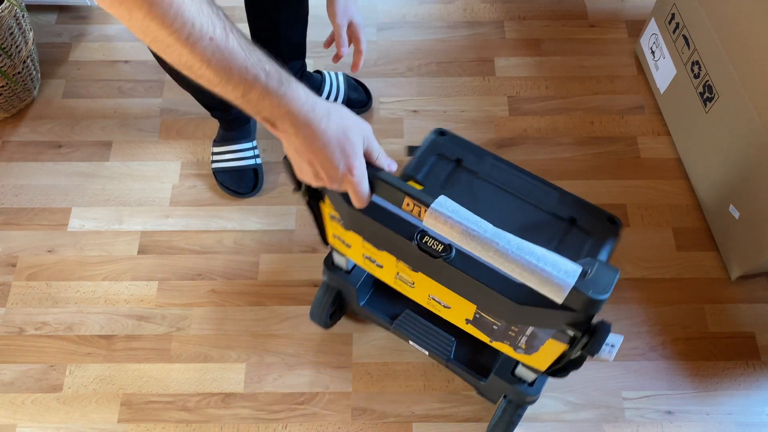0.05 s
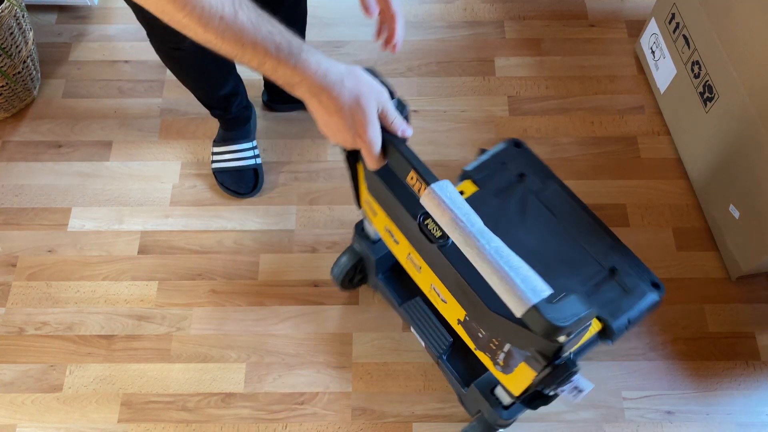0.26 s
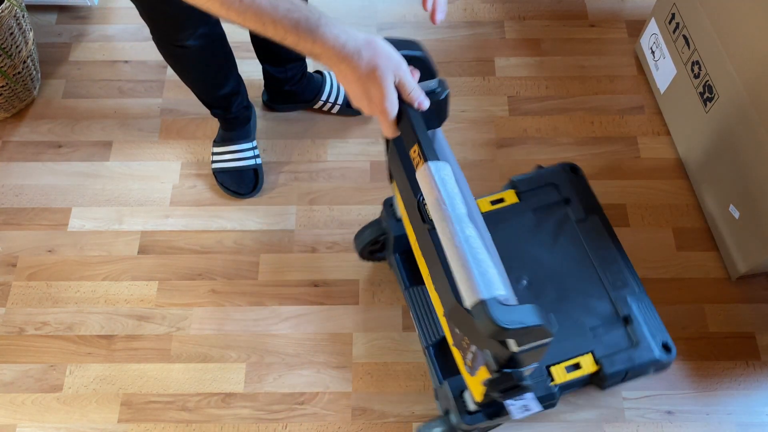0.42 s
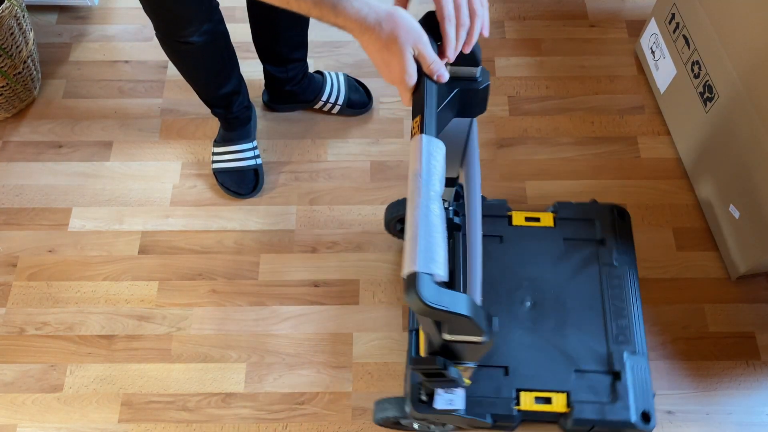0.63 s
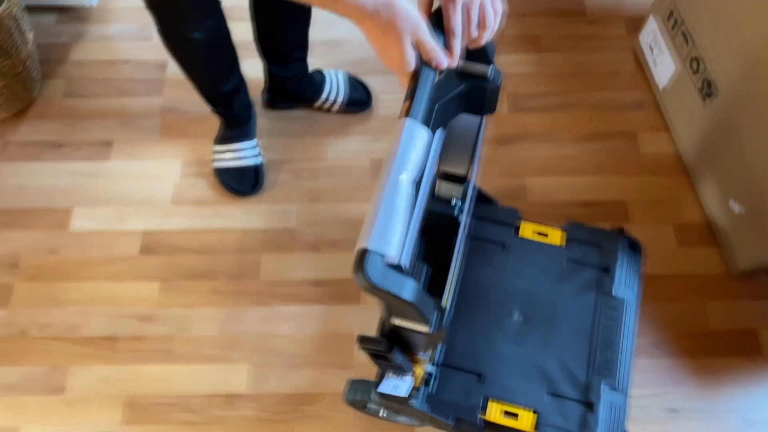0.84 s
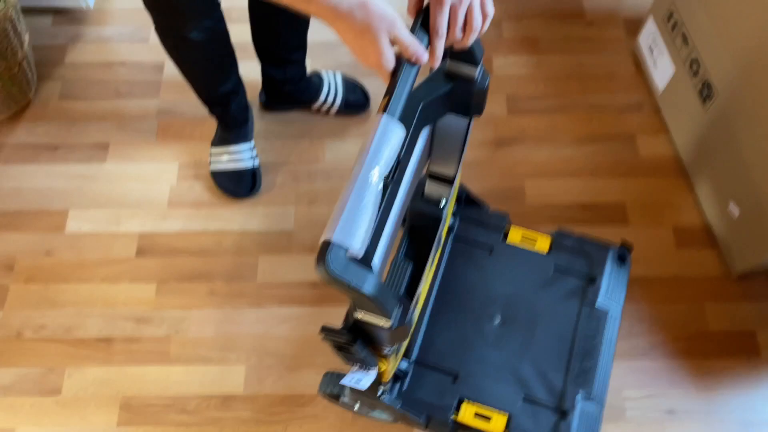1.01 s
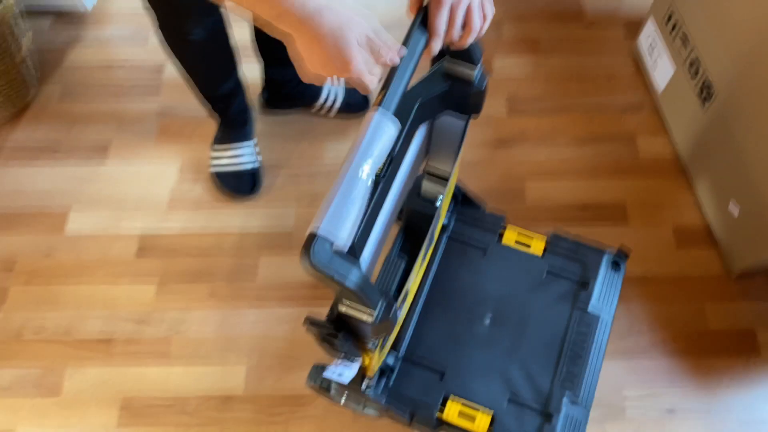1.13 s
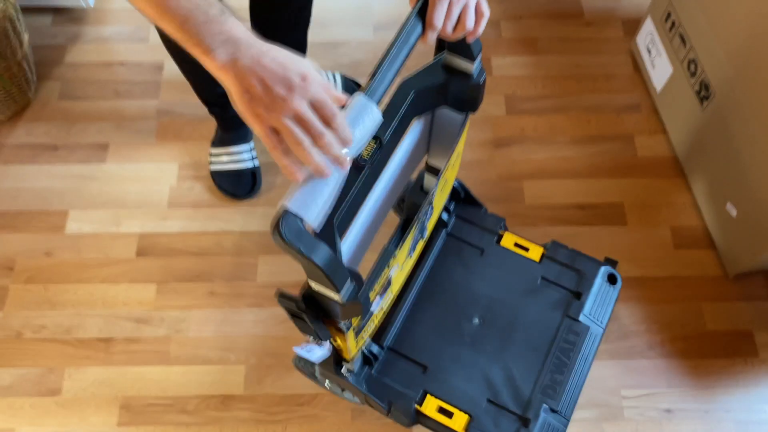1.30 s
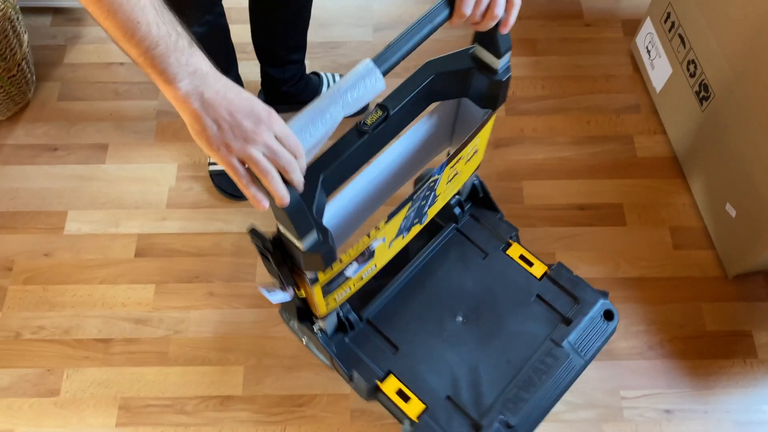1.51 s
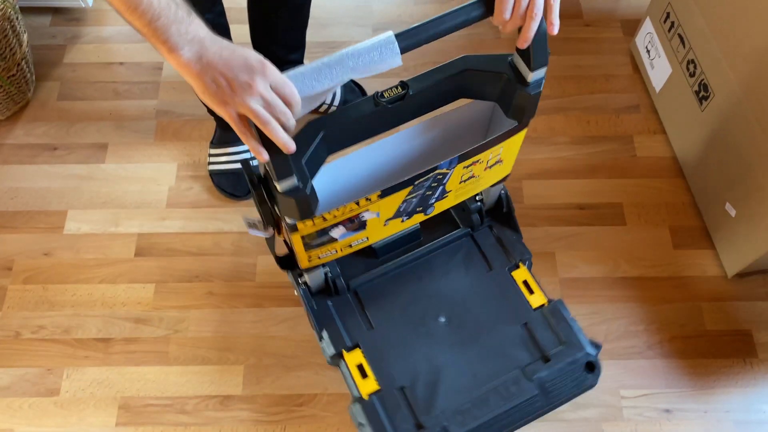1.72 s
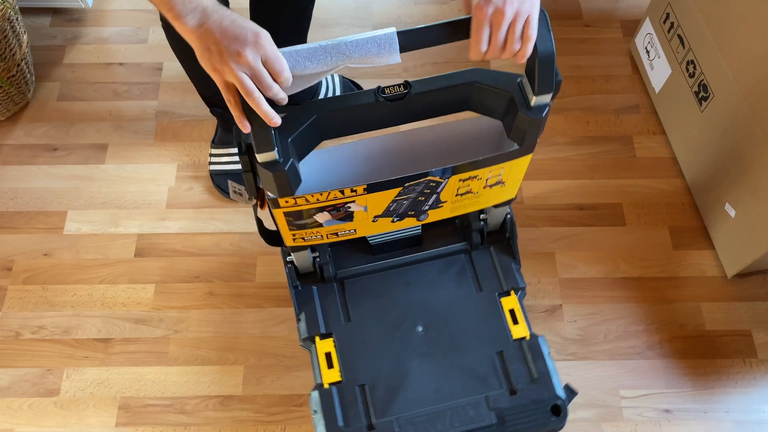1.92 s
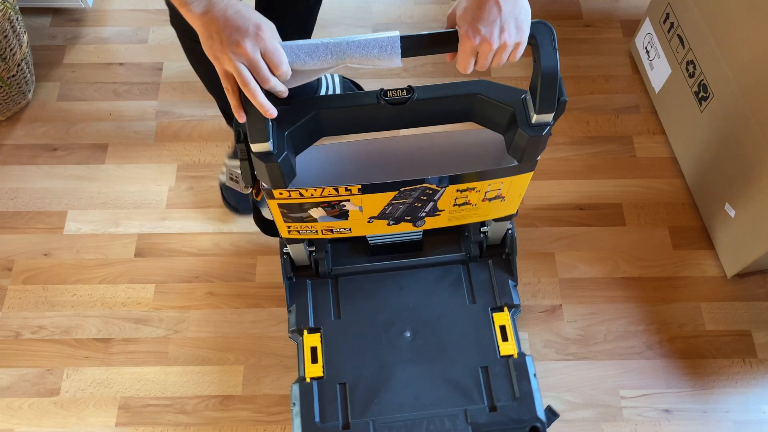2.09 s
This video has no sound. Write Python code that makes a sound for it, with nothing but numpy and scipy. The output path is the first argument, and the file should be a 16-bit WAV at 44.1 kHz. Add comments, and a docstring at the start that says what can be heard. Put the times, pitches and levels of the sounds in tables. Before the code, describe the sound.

Hard trolley wheels roll and bump across floorboards, with rattling plastic and a hollow clatter.

```python
"""A plastic tool trolley is wheeled and turned on a wooden floor in a small room, about a metre away.
Its hard wheels rumble and bump over the boards, one squeaks faintly, and loose parts shake and buzz.
At 0.8 s the handle and deck clatter and the floor booms under the weight. From 1.1 s hands slide
along the handle with a soft hiss. The trolley then rolls a little further and stops at about 2 s."""
import sys
import numpy as np
from scipy import signal
from scipy.fft import rfft, irfft, next_fast_len
from scipy.io import wavfile

SR = 44100
rng = np.random.default_rng(int(sys.argv[2]) if len(sys.argv) > 2 else 0)


def materialize(psi):
    """Save the field psi as 16-bit PCM at rate SR to the path in sys.argv[1].

    A 1-D psi becomes a single channel; in a 2-D psi each row is a channel.
    """
    bounded = np.clip(np.atleast_2d(psi).T, -1, 1)
    quanta = np.round(bounded * 32767).astype(np.int16)
    wavfile.write(sys.argv[1], SR, quanta)


N = 94815
T = np.arange(N) / SR
FFT_SIZE = next_fast_len(2 * N)
FREQS = np.maximum(np.arange(FFT_SIZE // 2 + 1) * SR / FFT_SIZE, 1)

# Tone of each noise, from bass to treble (frequency [Hz], relative level [dB])
AIR_TONE = [(25, -17.5), (60, -6), (200, -9), (500, -25), (2000, -46), (16000, -69.5)]
RUMBLE_TONE = [(30, -27), (60, -10.5), (110, -14), (190, -2), (340, -1.5), (470, -10.5), (3000, -62)]
CHATTER_TONE = [(200, -30), (520, 9.5), (1600, 0), (2000, -10), (2700, -11.5), (3600, -24.5), (5300, -25),
                (15000, -68)]
CRACK_TONE = [(200, -17.5), (600, 4), (1500, -3), (2000, 0.5), (2800, 3), (4000, -7), (7000, -14.5),
              (11000, -53), (16000, -88)]
HOLLOW_TONE = [(50, -27.5), (130, 6), (330, 2), (560, -6), (4000, -35.5)]
SKIN_TONE = [(200, -6), (900, -1), (2000, -4), (4000, 0), (11000, 1.5), (16000, -1)]
# How loud the rolling is (time [s], wheel rumble [dB], chatter of loose parts [dB])
ROLLING = [(0, -43.5, -55.5), (.15, -39.5, -53), (.3, -42, -51), (0.422, -42.5, -52), (0.549, -36, -41.5),
           (0.639, -38.5, -50), (.77, -42, -48), (.87, -34.5, -46.5), (1.039, -39, -47),
           (1.122, -58, -56.5), (1.28, -56, -67.5), (1.5, -48, -56.5), (1.68, -43, -55.5),
           (1.73, -35.5, -49.5), (1.81, -39, -41.5), (1.91, -41, -56), (2.0, -54.5, -64),
           (2.15, -61, -64.5)]
# Wheels hitting bumps, plus a low knock on the handle at 1.309 s (time [s], thud pitch [Hz], relative thud
# level [dB], rattle level [dB])
WHEEL_BUMPS = [(0.059, 277, -31, -50), (.201, 336, -21.5, -48), (0.262, 320, -24.5, -44),
               (0.321, 295, -26, -44), (.362, 255, -26, -44), (0.406, 349, -22.5, -43),
               (.44, 318, -23.5, -40.5), (.488, 275, -19.5, -46), (0.521, 345, -19, -38.5),
               (.553, 325, -16.5, -38.5), (0.644, 307, -28, -62), (0.67, 200, -30, -35.5),
               (0.731, 365, -23, -47), (.778, 331, -16.5, -38), (1.309, 210, -28.5, -53),
               (1.477, 279, -32, -51), (1.539, 204, -31.5, -56), (1.634, 287, -28, -59),
               (1.707, 340, -19, -41), (1.738, 271, -22, -40.5), (1.777, 346, -20, -35),
               (1.801, 309, -23, -41), (1.847, 335, -22.5, -53), (2.038, 290, -32.5, -77)]
# The chatter gets brighter as the trolley turns (time [s], highs compared with lows [dB])
BRIGHTNESS = [(.2, -8.5), (.5, 1), (1.75, 5)]
# Short buzzes of loose parts (time [s], pitch [Hz], level [dB], fade time [s])
PART_BUZZES = [(0.143, 1325, -47, 0.011), (0.162, 1467, -43, 0.011), (0.203, 624, -37, 0.012),
               (0.2564, 1576, -42, 0.0076), (.438, 1730, -46, 0.0036), (.485, 1550, -37, 0.0043),
               (0.529, 2595, -38, 0.011), (0.674, 985, -31, 0.007), (0.7969, 2034, -26, 0.0065),
               (1.2969, 3050, -46.5, 0.0028), (1.771, 1747, -39, 0.036)]
# Handle and deck knocking together (time [s], crack level [dB], hollow knock level [dB])
DECK_KNOCKS = [(0.7954, -22, -22.5), (.801, -27, -15), (0.813, -48, -22), (.824, -34, -16.5),
               (0.837, -42, -19.5), (0.848, -29, -22.5), (.854, -32.5, -20.5), (0.861, -32, -22.5),
               (0.877, -51, -43), (0.8971, -34, -29), (0.95, -43.5, -41), (1.007, -41.5, -27.5),
               (1.019, -41, -29.5), (1.037, -46, -36.5), (1.135, -54.5, -37.5)]
# Notes that deck and handle ring at (pitch [Hz], relative level [dB], time to fade by 60 dB [s])
DECK_NOTES = [(140, -12.5, 0.16), (182.5, -8.5, 0.44), (238, -10.5, 0.033), (315, -4.5, 0.15),
              (374.5, 1.5, 0.2), (599.5, -1.5, 0.19), (732, -21.5, 0.18), (900, -10, 0.19),
              (1084, -7.5, 0.11), (1938, -11, 0.13)]
# Weight landing on the floor (time [s], pitch [Hz], level [dB])
FLOOR_BOOMS = [(0.801, 72.8, -21), (0.867, 62, -30), (0.926, 64, -28), (0.994, 80.4, -33),
               (1.031, 48.2, -29.5), (1.14, 58, -39), (1.226, 60, -36.5), (1.368, 66.5, -39.5)]
# Hands sliding on the handle (start [s], hold time [s], level [dB], fade time [s])
HAND_SLIDES = [(1.116, 0.054, -68, 0.0055), (1.295, 0.021, -51, 0.016), (1.322, 0.015, -47, 0.0058),
               (1.441, 0.039, -52, 0.049), (1.576, 0.12, -71, 0.021), (1.752, 0.0053, -52.5, 0.0028),
               (1.766, 0.33, -63, 0.052)]
# How loud the room's echo is (frequency [Hz], level compared with the direct sound [dB])
ECHO_LEVEL = [(60, -27), (150, -10.5), (350, -7.5), (700, -1.5), (2400, -2.5), (10000, -2.5)]
# How long the echo lasts (frequency [Hz], time to fade by 60 dB [s])
ECHO_TIME = [(100, 0.55), (1000, 0.25), (4000, 0.39), (14000, 0.23)]
# How much louder the left side is (frequency [Hz], left minus right [dB])
BALANCE = [(300, 0.5), (700, 2.5), (1300, 0.3), (2400, 2.5), (4400, 5.5), (9000, 0.5)]


def gain(db):
    """Turn decibels into a number to multiply by."""
    return 10 ** (np.asarray(db) / 20)


def unit_power(x):
    """Scale a signal so that its average power is 1."""
    return x / np.sqrt(np.mean(x ** 2))


def look_up(table, hz):
    """Read between the rows of a (frequency, value) table, with octaves evenly spaced."""
    freqs, values = np.array(table, float).T
    return np.interp(np.log(hz), np.log(freqs), values)


def colour(x, tone):
    """Filter a signal to the given tone; white noise keeps its power."""
    cepstrum = irfft(np.log(unit_power(gain(look_up(tone, FREQS)))), FFT_SIZE)
    # folding onto the first half keeps the filter from sounding before a hit
    cepstrum[1:FFT_SIZE // 2] *= 2
    cepstrum[FFT_SIZE // 2 + 1:] = 0
    return irfft(rfft(x, FFT_SIZE) * np.exp(rfft(cepstrum)), FFT_SIZE)[:N]


def tiny_clicks(per_second, spread_db):
    """Many tiny contacts of uneven size, at random moments."""
    clicks = (rng.random(N) < per_second / SR) * rng.choice([-1, 1], N)
    return unit_power(clicks * gain(spread_db * np.clip(rng.standard_normal(N), -2, 2)))


def bursts(times, levels_db, fade_s):
    """Noise that jumps up at each hit and dies away."""
    power = sum(gain(db) ** 2 * (T >= start) * np.exp(-2 * np.abs(T - start) / fade_s)
                for start, db in zip(times, levels_db))
    return np.sqrt(power) * rng.standard_normal(N)


def soft_note(start, hz, rise_s, steepness=1):
    """A softly pushed part swells and fades; less steepness starts sooner and rings longer."""
    age = np.maximum(T - start, 0)
    return (age / rise_s * np.exp(1 - age / rise_s)) ** steepness * np.sin(2 * np.pi * hz * age)


def air():
    """The quiet room has a low, steady hush."""
    return gain(-50) * colour(rng.standard_normal(N), AIR_TONE)


def wheels(split_hz=1400, thud_rise_s=0.0049):
    """Hard wheels rumble on the boards; each bump thuds in the frame and rattles loose parts."""
    times, rumble_db, chatter_db = np.array(ROLLING).T
    bump_times, _, _, rattle_db = np.array(WHEEL_BUMPS).T
    rumble = tiny_clicks(per_second=1400, spread_db=3) * gain(np.interp(T, times, rumble_db))
    chatter = tiny_clicks(per_second=600, spread_db=1) * gain(np.interp(T, times, chatter_db))
    chatter = colour(chatter + bursts(bump_times, rattle_db, fade_s=0.021), CHATTER_TONE)
    lows = signal.sosfiltfilt(signal.butter(2, split_hz, fs=SR, output="sos"), chatter)
    highs = chatter - lows
    tilt = gain(np.interp(T, *np.array(BRIGHTNESS).T) / 2)
    thuds = np.zeros(N)
    for start, hz, db, _ in WHEEL_BUMPS:
        deeper_note = gain(-7.5) * soft_note(start, 0.696 * hz, thud_rise_s)
        thuds += gain(db) * (soft_note(start, hz, thud_rise_s) + deeper_note)
    return colour(rumble, RUMBLE_TONE) + lows / tilt + highs * tilt + gain(-4) * thuds


def squeak(middle_s=0.17, length_s=0.3, top_hz=10300, sag=0.14, level_db=-81.5):
    """A wheel gives one faint, rough squeak whose pitch rises, holds and falls."""
    progress = np.clip(2 * (T - middle_s) / length_s, -1, 1)
    roughness = rng.standard_normal(N) / 10
    hz = top_hz * (1 - sag * np.abs(progress) ** 3 + roughness)
    return gain(level_db) * (1 - progress ** 2) * np.sin(2 * np.pi * np.cumsum(hz) / SR)


def loose_parts(sharpness=30, top_hz=4500):
    """Latches and clips buzz in their seats, each at its own pitch."""
    buzzes = np.zeros(N)
    for start, hz, db, fade_s in PART_BUZZES:
        b, a = signal.iirpeak(hz, sharpness, fs=SR)
        boost = np.sqrt(SR * sharpness / (np.pi * hz))  # restores the power the narrow filter removes
        buzzes += boost * signal.lfilter(b, a, bursts([start], [db], fade_s))
    return signal.sosfilt(signal.butter(2, top_hz, fs=SR, output="sos"), buzzes)


def knocks():
    """Plastic parts strike each other: a crack, a hollow knock and the ring of deck and handle."""
    times, crack_db, hollow_db = np.array(DECK_KNOCKS).T
    ring, age = np.zeros(N), T[:SR // 2]
    for start, db in zip(times, hollow_db):
        first = int(start * SR)
        for hz, note_db, ring_s in DECK_NOTES:
            chance = rng.standard_normal()  # nudges pitch and level, so no two knocks are alike
            fade = np.exp(-np.log(1000) * age / ring_s)
            note = np.sin(2 * np.pi * hz * (1 + 0.0066 * chance) * age)
            ring[first:first + len(age)] += gain(db + note_db + 2 * chance) * fade * note
    crack = colour(bursts(times, crack_db, fade_s=0.0071), CRACK_TONE)
    hollow = colour(bursts(times, hollow_db, fade_s=0.0077), HOLLOW_TONE)
    return crack + hollow + gain(-11.5) * ring


def floorboards():
    """The wooden floor booms under shifting weight, at a pitch that depends on where the load lands."""
    return sum(gain(db) * soft_note(start, hz, rise_s=0.024, steepness=2)
               for start, hz, db in FLOOR_BOOMS)


def hands(rise_s=0.0015):
    """Skin slides over the handle with a fine, bright hiss."""
    loudness = np.zeros(N)
    for start, hold_s, db, fade_s in HAND_SLIDES:
        rise = np.clip((T - start) / rise_s, 0, 1)
        fade = np.exp(-np.maximum(T - start - hold_s, 0) / fade_s)
        loudness += gain(db) * rise * fade
    return colour(loudness * rng.standard_normal(N), SKIN_TONE)


def room(x, echo_gap_s=0.004, right_lag_s=0.000026):
    """Sound reaches the left side a little sooner and louder, then the room adds a short, soft echo."""
    age = T[:SR // 2]
    echo = np.zeros((2, len(age)))
    for hz in 45 * 2 ** (np.arange(18) / 2):  # bands half an octave wide
        band = signal.butter(2, [hz / 2 ** .25, hz * 2 ** .25], "band", fs=SR, output="sos")
        fade = np.exp(-np.log(1000) * age / look_up(ECHO_TIME, hz)) * (age > echo_gap_s)
        reflections = rng.standard_normal(echo.shape) * fade / np.linalg.norm(fade)
        echo += gain(look_up(ECHO_LEVEL, hz)) * signal.sosfilt(band, reflections)
    sides = np.array([[1], [-1]])  # left, right
    direct = np.exp(1j * sides * np.pi * FREQS * right_lag_s)
    balance = gain(sides * look_up(BALANCE, FREQS) / 2)
    echo_boost = np.sqrt(1 + gain(look_up(ECHO_LEVEL, FREQS)) ** 2)
    response = (direct + rfft(echo, FFT_SIZE)) * balance / echo_boost
    return irfft(rfft(x, FFT_SIZE) * response, FFT_SIZE)[:, :N]


def scene():
    """The trolley and the hands in the quiet room."""
    return room(air() + wheels() + squeak() + loose_parts() + knocks() + floorboards() + hands())


def record(dry):
    """The recorder cuts the deepest bass and the highest treble."""
    bass_cut = signal.butter(2, 17, "high", fs=SR, output="sos")
    treble_cut = signal.ellip(8, .2, 70, 16000, fs=SR, output="sos")
    return signal.sosfilt(treble_cut, signal.sosfilt(bass_cut, dry))


dry = scene()
out = record(dry)
materialize(out)
```